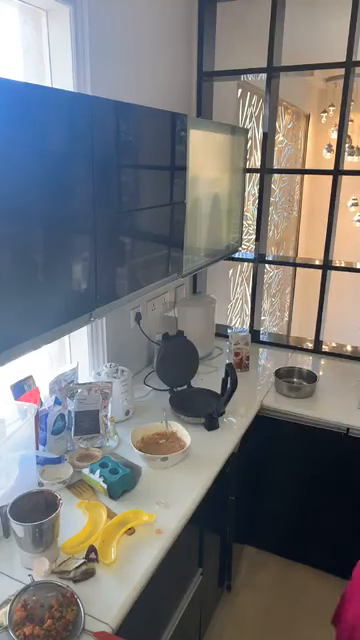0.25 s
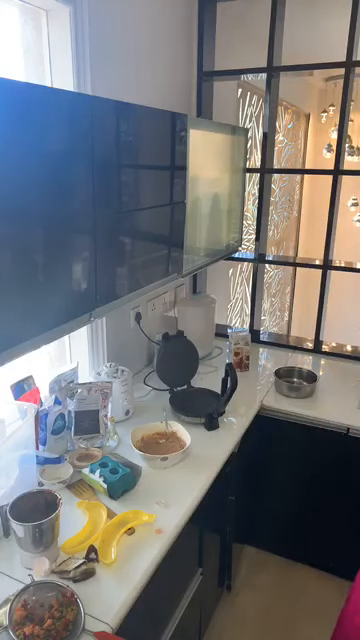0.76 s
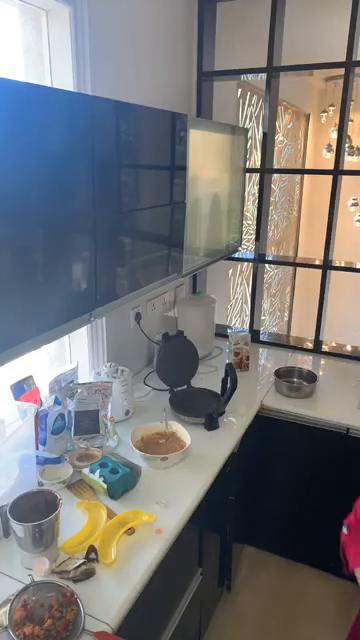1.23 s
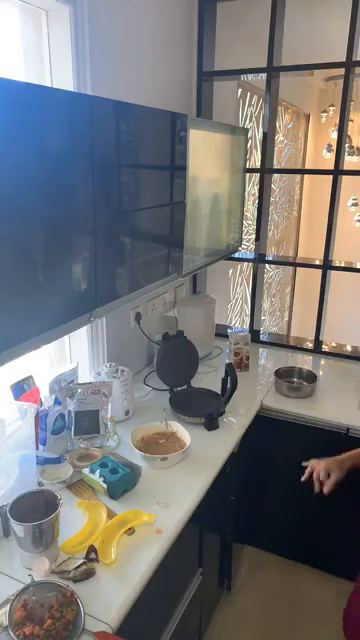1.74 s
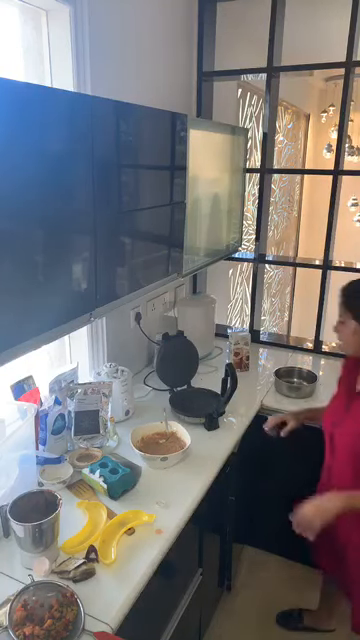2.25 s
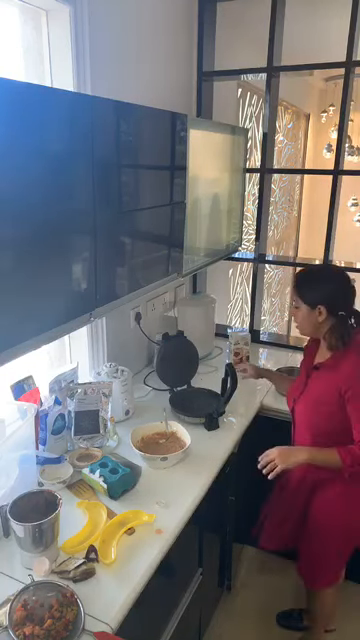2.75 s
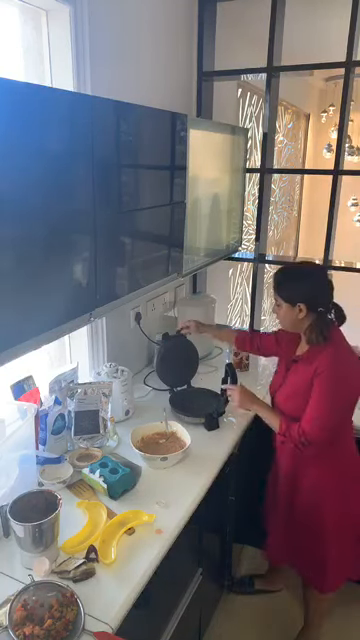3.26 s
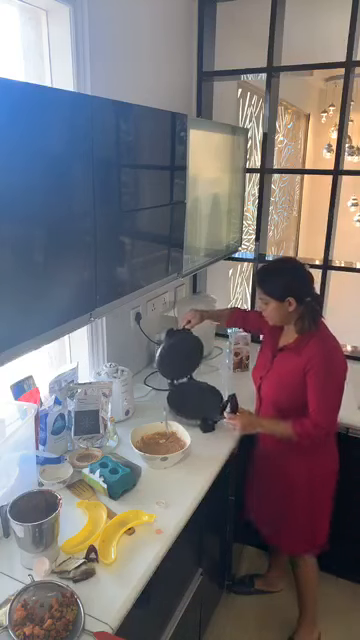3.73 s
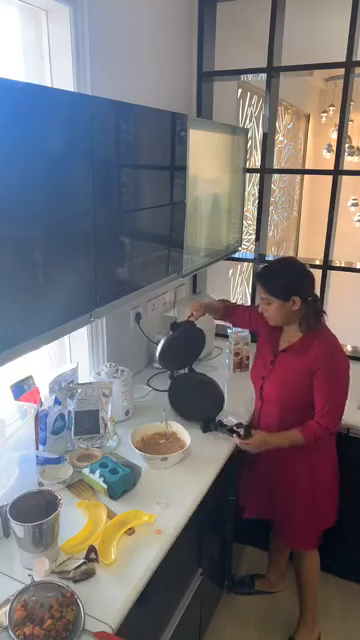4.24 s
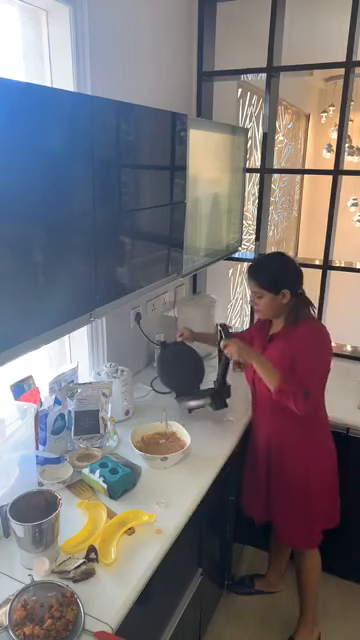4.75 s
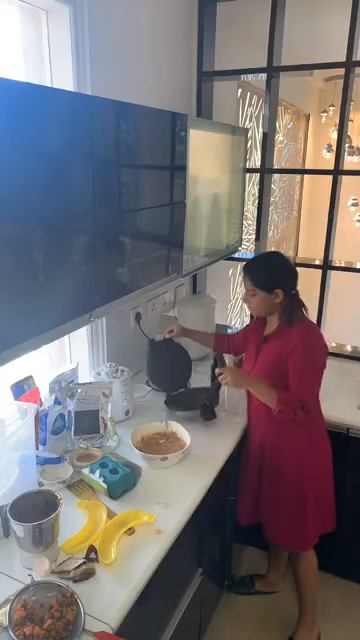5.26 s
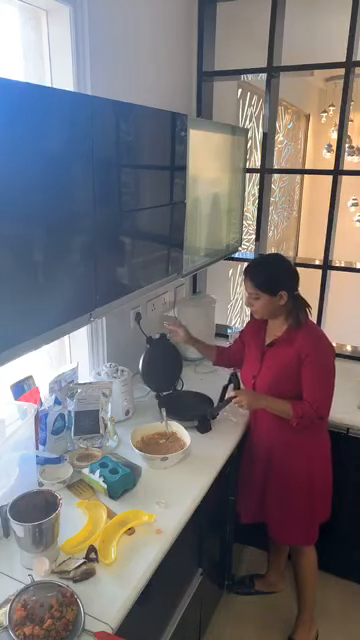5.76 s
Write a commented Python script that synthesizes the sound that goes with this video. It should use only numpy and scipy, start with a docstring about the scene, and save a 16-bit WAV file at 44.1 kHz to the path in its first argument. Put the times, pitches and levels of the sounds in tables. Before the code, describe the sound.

A sharp knock, shuffling slippers, then a flatbread press clacking and thumping on a hollow counter in an echoing kitchen.

```python
"""Roti maker in a tiled kitchen

Something hard is knocked down close by, then a cook in slippers shuffles up to the counter, dress
swishing, and works the hinged lid and lever of a roti maker. They click and clack, the cast plates ring
briefly, and the tipped appliance drops back on its feet so that the hollow counter booms.
The hard walls give a ringing echo, and a fridge hums quietly."""
import sys
import numpy as np
from scipy import signal
from scipy.fft import rfft, irfft
from scipy.io import wavfile
from scipy.ndimage import uniform_filter1d, minimum_filter1d

SR = 44100
rng = np.random.default_rng(int(sys.argv[2]) if len(sys.argv) > 2 else 0)


def to_wav(s):
    """Save 16-bit WAV."""
    ch = np.atleast_2d(s).T  # columns
    pcm = np.round(np.clip(ch, -1, 1) * 32767)  # PCM
    wavfile.write(sys.argv[1], SR, pcm.astype(np.int16))


N = 264618
T = np.arange(N) / SR
RING = T[:SR]  # the second that follows a blow


# Lever clacks: t/s, level/dB, brightness/(dB per octave), rattle time/s, catch f/Hz, stop f/Hz,
# stop level over catch/dB
CLACKS = [(3.4742, -1, 1.67, 0.067, 800, 2310, 0.5), (4.5550, -1.5, -0.07, 0.04, 1570, 3170, 0.5),
          (5.724, -4.5, -1.04, 0.043, 2080, 1550, -4)]
# Tone of a clack, from thump to tick: level/dB
CLACK_TONE = [-4.5, 9, -3, 0, -12]

def lever(snap_s=0.005, boost_db=11):
    """The lever catches, then snaps home against its stop: two quick blows."""
    out = np.zeros(N)
    for s, db, brightness, rattle_s, catch_hz, stop_hz, stop_db in CLACKS:
        catch = strike(tilt(CLACK_TONE, db, brightness), rattle_s, catch_hz, boost_db)
        stop = strike(tilt(CLACK_TONE, db + stop_db, brightness), rattle_s, stop_hz, boost_db)
        add(out, s, catch)
        add(out, s + snap_s, stop)
    return out


# Base bumps: t/s, level/dB, brightness/(dB per octave), extra thump/dB, struck part f/Hz, its boost/dB
BUMPS = [ (3.343, -14, -1.5, -6.5, 330, 2), (3.451, -6, -0.1, -3, 217, 3),
         (3.844, -5, -0.2, -18, 425, 17.5), (3.886, 2.5, 0.2, -0.5, 1580, 10),
         (3.915, -8, -2.5, -8.5, 1680, 16), (5.057, 4, 0.5, -3, 320, 15.5),
         (5.411, -3.5, 0.3, -0.5, 250, 13.5), (5.555, -10.5, -0.9, -2, 259, 5),
         (5.733, -12, -0.2, 3.5, 151, 6)]
# Tone of a bump, from thump to tick: level/dB
BUMP_TONE = [20, 4.5, -3.5, -9.5, -22]

def base_bumps(rattle_s=0.046):
    """The roti maker's base bumps dully on the worktop; its weight gives the thump."""
    out = np.zeros(N)
    for s, db, brightness, thump_db, part_hz, boost_db in BUMPS:
        tone_db = tilt(BUMP_TONE, db, brightness)
        tone_db[0] += thump_db
        add(out, s, strike(tone_db, contact_time(rattle_s, brightness), part_hz, boost_db))
    return out


# Notes of the cast plates and of the hollow base: f/Hz, level/dB, ring time/s
PLATE_NOTES = [(777, -23, 0.47), (1202, 14.5, 0.32), (1513, 9.5, 0.22), (2050, 18.5, 0.02),
               (2450, -7, 0.053), (2730, -8, 0.12), (2760, 10, 0.1), (3460, -27, .1), (3870, 16, 0.12),
               (4230, 1, 0.076)]
BASE_NOTES = [(173.7, 4, 0.5), (201, -8, 0.12), (251, 6, 0.72), (330.4, 7, 0.41), (557, 5.5, 0.14)]

def strike(tone_db, rattle_s, part_hz, boost_db):
    """A blow clacks in the struck part and sets the plates and the hollow base ringing."""
    contact = blow(tone_db, chatter(rattle_s), top_db=-20)
    clack = contact + (undb(boost_db) - 1) * resonate(contact, part_hz, 0.21 * part_hz)
    plates = through(clack, ring(PLATE_NOTES, detune=0.0075))
    bass_db = (tone_db[0] + tone_db[1]) / 2
    base = undb(bass_db) * ring(BASE_NOTES, detune=0.0076)
    return undb(-6.5) * clack + undb(-68) * plates + undb(-62) * base


# Deep booms from a heavy footstep and from the appliance landing on the counter: t/s, level/dB
BOOMS = [(2.101, -44), (3.883, -46), (5.066, -25), (5.433, -40)]
# Deep notes of the cabinet: f/Hz, level/dB, ring time/s
CABINET_NOTES = [(53.9, 3, 0.58), (61.3, -4.5, 0.31), (80.8, -7.5, 0.78)]

def counter(rise_s=0.006):
    """The hollow cabinet under the worktop takes a moment to get moving, then booms."""
    out = np.zeros(N)
    for s, db in BOOMS:
        add(out, s, undb(db) * ring(CABINET_NOTES) * (1 - np.exp(-RING / rise_s)))
    return out


# The falling object's hits, then their slap off the nearest wall: t/s, level/dB, contact time/s
KNOCK_HITS = [(.0066, -11, 0.000017), (.0085, 1, 0.00022), (0.0111, 6, 0.0013), (0.0208, 3.5, 0.0012)]
# Tone of the whole knock: f/Hz, level/dB
KNOCK_TONE = [(40, -44), (100, -27.5), (150, -10), (260, -9), (380, -9), (560, -1), (780, -5), (980, -6.5),
              (1450, -10), (2200, -17.5), (2800, -23.5), (4300, -25), (8500, -24), (10800, -33),
              (15000, -24)]
# Bright resonances of the object: f/Hz, width/Hz, level/dB
CLANG = [(2280, 210, -8), (3560, 88, 5.5), (4250, 250, 2.5), (5740, 56, 7)]
# Notes of the board it lands on: f/Hz, level/dB, ring time/s
BOARD_NOTES = [(168, -5.5, 0.67), (231, -3.5, 0.2), (307.5, -17, 1), (355, 8, 0.26), (478, -26, 0.46),
               (532, 15.5, 0.16), (640, -7, 0.13), (637, -22, 0.9), (753, -10, 1), (914, 12, 0.083),
               (1074, -28, 0.66), (1298, -4, .28), (1400, -25, 0.34)]

def knock():
    """A hard object lands edge first, then flat, on a board that rings on. Gives (crack, board)."""
    edge_s, flat_s = KNOCK_HITS[1][0], KNOCK_HITS[2][0]
    force, rattle, board = np.zeros((3, N))
    for s, db, contact_s in KNOCK_HITS:
        push = np.exp(-RING / contact_s)
        add(force, s, undb(db) * push / push.sum())
    # the board moves as one at low pitch; the treble comes from one short rattle of the object
    bass = cut(force, 3, 1700, keep="low")
    add(rattle, edge_s, chatter(0.1))
    rattle += sum(undb(db) * resonate(rattle, hz, width) for hz, width, db in CLANG)
    treble = cut(rattle, 2, 1400, keep="high")
    treble = cut(treble, 1, 2000, keep="low")
    crack = through(bass + undb(-3) * treble, colour(KNOCK_TONE))
    add(board, flat_s, ring(BOARD_NOTES))
    return undb(27) * crack, undb(-28.5) * cut(board, 2, 130, keep="high")


# Slippers meeting the tiles: t/s, level/dB, brightness/(dB per octave)
STEPS = [(0.522, -6.5, -1.7), (.560, -19.5, -1.7), (1.501, -5.5, -1), (1.540, 0, -1.5), (1.639, -8, -1.7),
         (2.014, -2.5, 2.6), (2.043, 10, 5), (2.080, 9, 0.33), (2.14, 4.5, 0.5), (3.090, -12.5, 1.5),
         (3.197, -8, -0.5)]
# Tone of a step, from thump to tick: level/dB
STEP_TONE = [3, 2.5, -10, -15, -29]

def footsteps(rattle_s=0.11):
    """Loose slippers slap the tiles and the heel follows; a soft sole spreads each contact."""
    out = np.zeros(N)
    for s, db, brightness in STEPS:
        sole = chatter(contact_time(rattle_s, brightness), count=8)
        add(out, s, blow(tilt(STEP_TONE, db, brightness), sole, top_db=-17))
    return out


# Slides of the soles and hinge: t/s, length/s, level/dB, centre f/Hz, width/Hz
SCUFFS = [ (0.86, 0.18, -59, 3060, 3000), (1.095, 0.043, -58.5, 1145, 160), (1.547, 0.21, -54.5, 600, 1070),
          (2.016, 0.073, -40.5, 1405, 1700), (2.308, 0.29, -47.5, 1254, 694),
          (2.487, 0.17, -56.5, 1610, 750), (2.642, 0.087, -57, 2830, 1500), (3.093, 0.058, -49, 1070, 604),
          (3.575, 0.21, -64, 2450, 1500), (4.379, 0.063, -59, 1910, 1760), (4.385, 0.064, -62.5, 2700, 397)]

def scuffs():
    """Soles and hinge slide: tiny slips rasp through one steep resonance."""
    out = np.zeros(N)
    for s, length, db, hz, width in SCUFFS:
        rasp = resonate(slips(), hz, width)
        rasp = resonate(rasp, hz, width)  # twice makes it steeper
        add(out, s, level(rasp, db) * stroke(length, swell=0.34))
    return out


# Swishes of the dress: t/s, length/s, level/dB
SWISHES = [(1.08, 0.076, -52), (1.147, 0.29, -62), (1.618, 0.15, -61.5), (1.803, 0.33, -63),
           (2.3, 0.46, -55), (2.632, 0.1, -53), (2.817, 0.16, -65), (3.099, 0.084, -52)]
# Tone of rubbing cloth: f/Hz, level/dB
CLOTH_TONE = [(200, -6), (1000, 9.5), (3000, 6.5), (5500, 0.5), (8500, -2), (10800, -17), (15000, -11)]

def dress():
    """Cloth slides with a dry hiss as the cook strides and reaches."""
    out = np.zeros(N)
    for s, length, db in SWISHES:
        hiss = through(slips(), colour(CLOTH_TONE))
        add(out, s, level(hiss, db) * stroke(length, swell=0.85))
    return out


# How long the echo lasts at each pitch: f/Hz, ring time/s
ECHO_TIMES = [(60, 0.61), (250, 0.75), (1000, 0.76), (3000, 0.8), (8000, 0.77), (15000, 0.29)]

def kitchen(x, echo_db):
    """Hard walls and cupboards: the direct sound, then a dense echo that loses its top treble first."""
    noise = rfft(even(rng.standard_normal(len(RING)), span_hz=60))
    log_f = np.log(np.maximum(np.fft.rfftfreq(len(RING), 1 / SR), 1))
    hz, ring_times = np.transpose(ECHO_TIMES)
    tail = np.zeros(len(RING))
    for band, ring_s in zip(np.eye(len(hz)), ring_times):
        share = np.interp(log_f, np.log(hz), band)
        tail += irfft(noise * share, len(RING)) * fade(ring_s)
    build_up = np.clip((RING - 0.003) / 0.001, 0, 1)
    return x + undb(echo_db) * through(x, unit(tail * build_up))


# Tone of the room's air: f/Hz, level/dB
AIR_TONE = [(15, -33), (25, -2.5), (96, -11.5), (193, -5), (227, -10), (297, -10.5), (598, -12.5),
            (666, -20), (826, -16.5), (1050, -20), (1240, -19), (2770, -29.5), (3530, -34.5), (4750, -34.5),
            (15500, -56.5)]
# Notes of the fridge: f/Hz, level/dB
FRIDGE_HUM = [(46, -62), (94, -64), (186, -66)]

def air_and_fridge():
    """Quiet room air, a faint hiss and the wavering hum of a fridge."""
    out = level(through(rng.standard_normal(N), colour(AIR_TONE)), -56.5)
    out += level(rng.standard_normal(N), -85.5)
    for hz, db in FRIDGE_HUM:
        waver = np.cumsum(rng.standard_normal(N)) * 0.0227
        out += level(np.sin(2 * np.pi * hz * T + waver), db)
    return out


# The five pitches that set a blow's tone (thump, body, knock, clack, tick): f/Hz
TONE_PITCHES = [130, 350, 1000, 2300, 7000]

def blow(tone_db, rattle, top_db):
    """One contact: a dying rattle, coloured by how soft or hard the parts are."""
    thump_db, tick_db = tone_db[0], tone_db[-1]
    top = [(9000, tick_db - 4), (10800, tick_db + top_db), (15000, tick_db + top_db + 3)]
    return through(rattle, colour([(45, thump_db - 21), *zip(TONE_PITCHES, tone_db), *top]))


def tilt(tone_db, db, brightness, pivot_hz=1000):
    """A harder contact tilts the tone of a blow towards the treble."""
    return np.array(tone_db) + db + brightness * np.log2(np.array(TONE_PITCHES) / pivot_hz)


def contact_time(rattle_s, brightness):
    """Harder, brighter contacts are over sooner."""
    return rattle_s * np.exp(-0.25 * np.clip(brightness, -2, 2))


def chatter(rattle_s, count=6, feedback=0.68):
    """A chain of echoes scatters a click into a short rattle, equally strong at all pitches."""
    turn = -2j * np.pi * np.fft.rfftfreq(len(RING), 1 / SR)
    lags = rattle_s / 45 * np.geomspace(0.25, 1, count) * rng.uniform(0.8, 1.2, count)
    spectrum = 1
    for k, lag in enumerate(lags):
        echo = (-1) ** k * np.exp(turn * round(lag * SR) / SR)  # sign flips keep the bass from lagging
        spectrum = spectrum * (feedback - echo) / (1 - feedback * echo)
    return irfft(spectrum, len(RING))


def ring(notes, detune=0):
    """Notes struck together die away; detune shifts each pitch a little at random."""
    out = np.zeros(len(RING))
    for hz, db, ring_s in notes:
        pitch = hz * (1 + detune * rng.standard_normal())
        out += undb(db) * fade(ring_s) * np.sin(2 * np.pi * pitch * RING)
    return out


def slips(grain_db=4):
    """Dense uneven slips of one surface over another."""
    return rng.standard_normal(len(RING)) * undb(grain_db * rng.standard_normal(len(RING)))


def stroke(length, swell, grip_db=2):
    """Loudness of a slide that grips unevenly; swell is the share of it spent speeding up."""
    speed = np.interp(RING / length, [0, swell, 1], [0, 1, 0])
    grip = uniform_filter1d(rng.standard_normal(len(RING)), SR // 100)
    return speed ** 0.35 * undb(grip_db * level(grip, 0))


def resonate(x, hz, width):
    """Let through the pitches around hz."""
    return signal.lfilter(*signal.iirpeak(hz, hz / width, fs=SR), x)


def cut(x, order, hz, keep):
    """Keep the low or high side of hz; a higher order cuts more steeply."""
    return signal.sosfilt(signal.butter(order, hz, keep, fs=SR, output="sos"), x)


def colour(points, size=8192):
    """A click whose tone follows (f/Hz, level/dB) points, for use as a filter."""
    hz, db = np.transpose(points)
    f = np.maximum(np.fft.rfftfreq(size, 1 / SR), 1)
    gain = undb(np.interp(np.log(f), np.log(hz), db))
    cepstrum = irfft(np.log(gain))
    # fold it so that nothing sounds before the click
    cepstrum[1:size // 2] *= 2
    cepstrum[size // 2 + 1:] = 0
    return irfft(np.exp(rfft(cepstrum)))


def even(x, span_hz):
    """Flatten the broad humps and dips in a noise's tone, keeping its fine grain."""
    spectrum = rfft(x)
    power = uniform_filter1d(np.abs(spectrum) ** 2, int(span_hz * len(x) / SR) + 1)
    return irfft(spectrum / np.sqrt(np.abs(power) + 1e-12), len(x))


def through(x, response):
    """Pass a sound through something, given its response to a click."""
    return signal.fftconvolve(x, response)[:len(x)]


def fade(ring_s):
    """Die away by 60 dB over the ring time."""
    return np.exp(-np.log(1000) * RING / ring_s)


def undb(db):
    """Decibels to gain."""
    return 10 ** (np.asarray(db) / 20)


def unit(x):
    """Scale to an energy of one."""
    return x / np.sqrt(np.sum(x ** 2))


def level(x, db):
    """Scale to an average (rms) level."""
    return x * undb(db) / np.std(x)


def add(track, s, sound):
    """Mix a sound into a track from time s."""
    i = max(int(s * SR), 0)
    track[i:i + len(sound)] += sound[:N - i]


def scene():
    """All sources in the one kitchen; the knock is nearest."""
    crack, board = knock()
    near = kitchen(crack, echo_db=2.5) + board
    roti_maker = kitchen(lever() + base_bumps(), echo_db=1)
    cook = kitchen(footsteps() + scuffs() + dress(), echo_db=-1)
    return (near + roti_maker + cook + counter() + air_and_fridge())[None]


def record(dry):
    """A limiter turns down the hardest peaks; the deepest bass and the highest treble are cut."""
    ceiling, window, top_hz = 0.5, 353, 15800  # window in samples
    gain = ceiling / np.maximum(np.abs(dry), ceiling)
    gain = uniform_filter1d(minimum_filter1d(gain, window), window)
    thinned = cut(dry * gain, 2, 30, keep="high")
    return signal.sosfilt(signal.ellip(10, 0.2, 70, top_hz, fs=SR, output="sos"), thinned)


dry = scene()
out = record(dry)
to_wav(out)
```